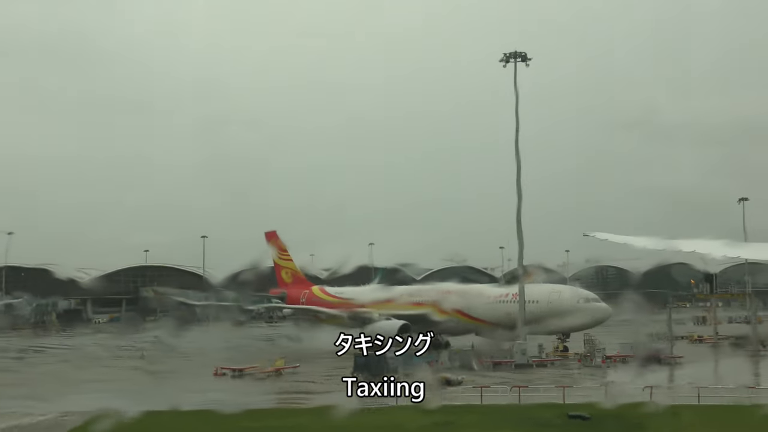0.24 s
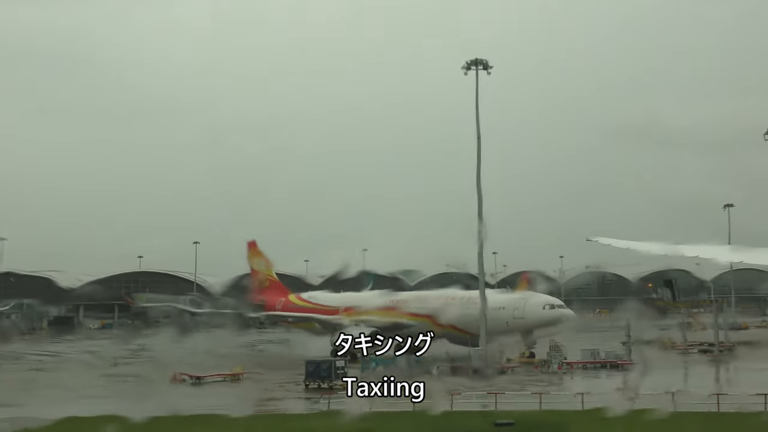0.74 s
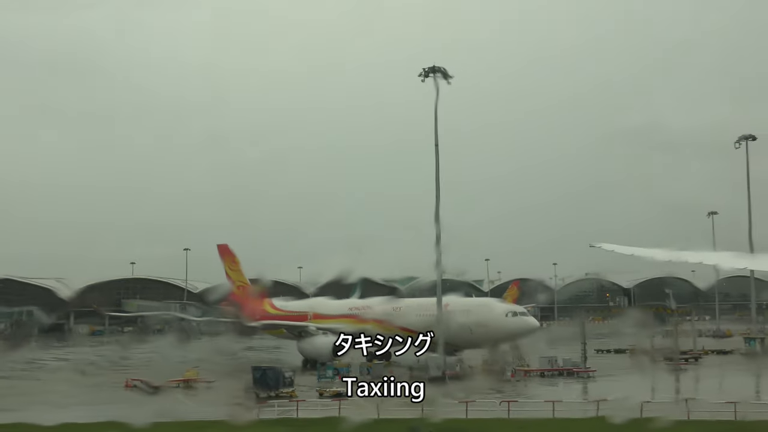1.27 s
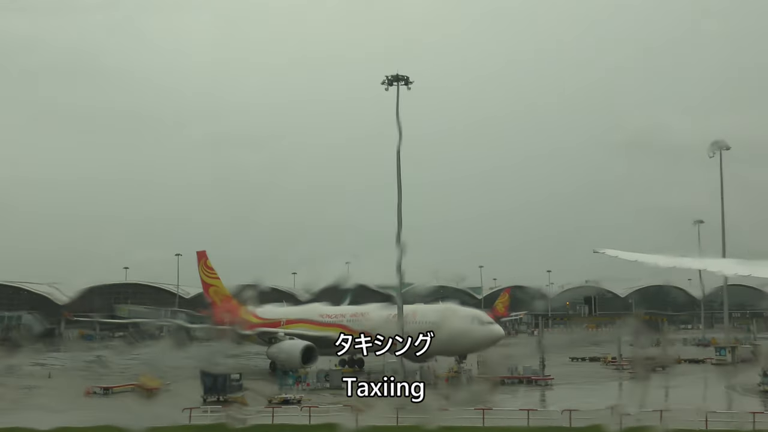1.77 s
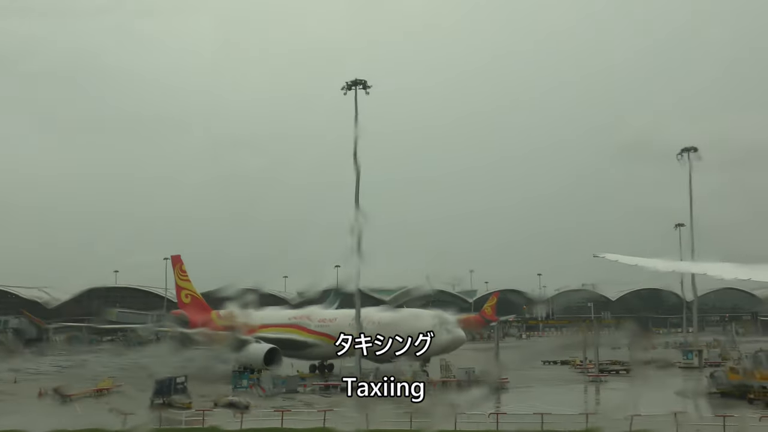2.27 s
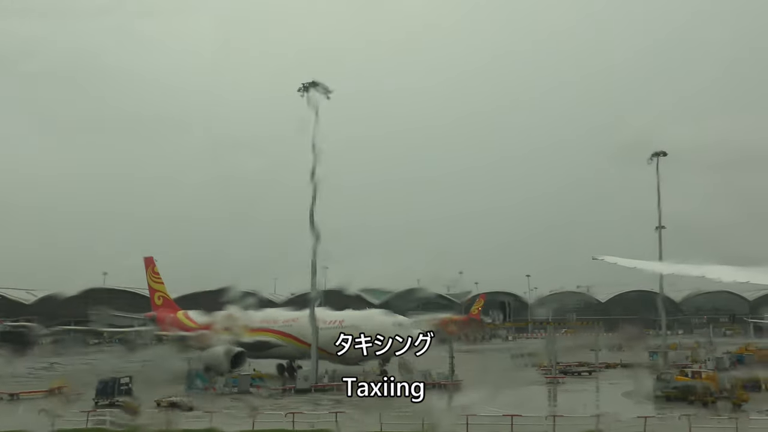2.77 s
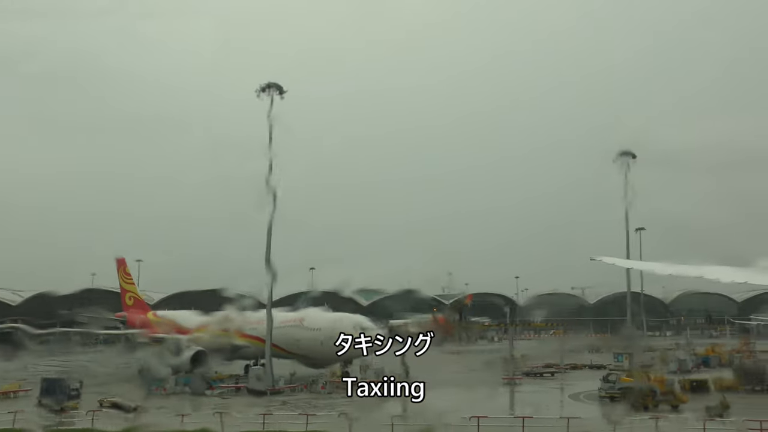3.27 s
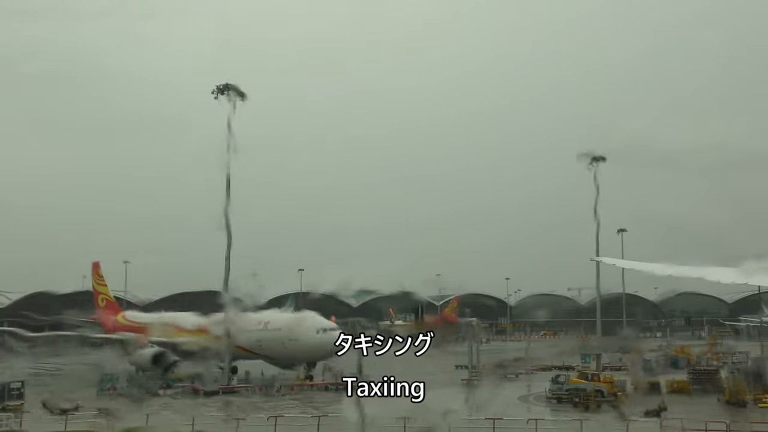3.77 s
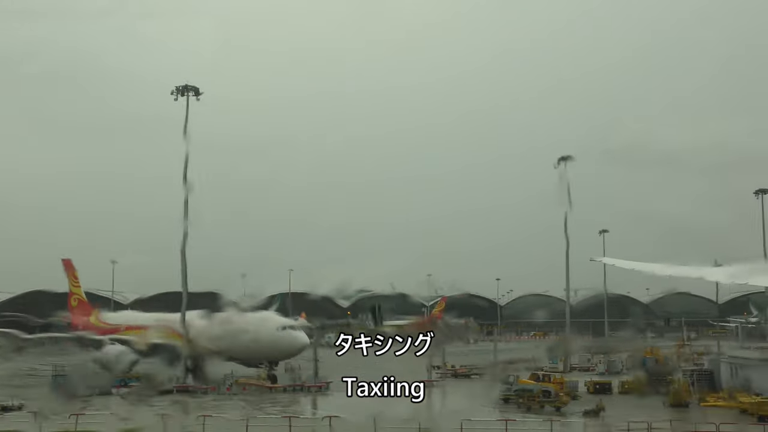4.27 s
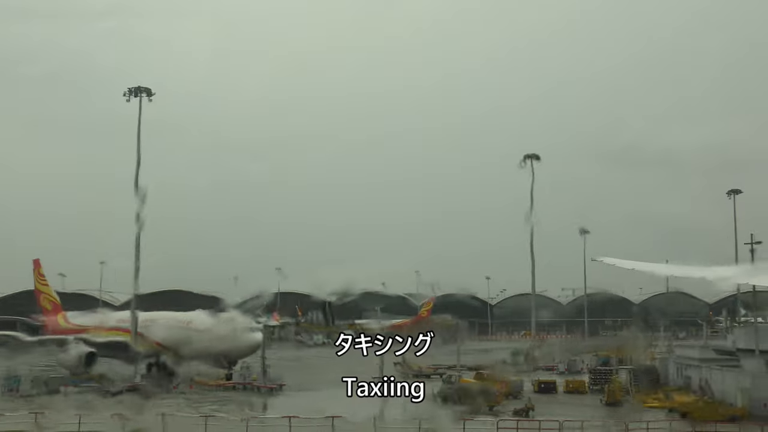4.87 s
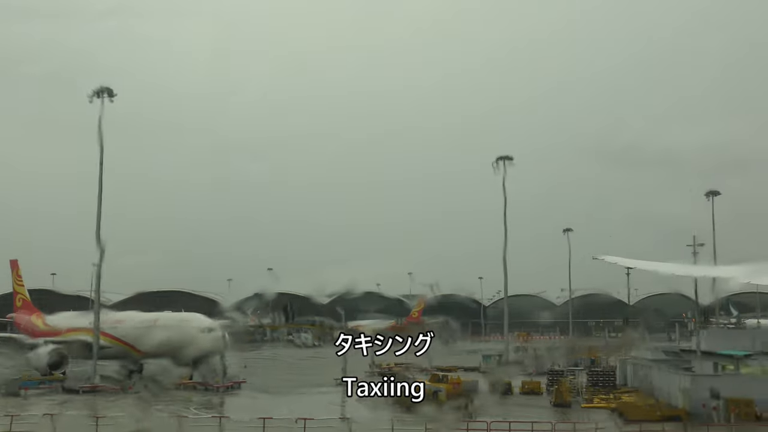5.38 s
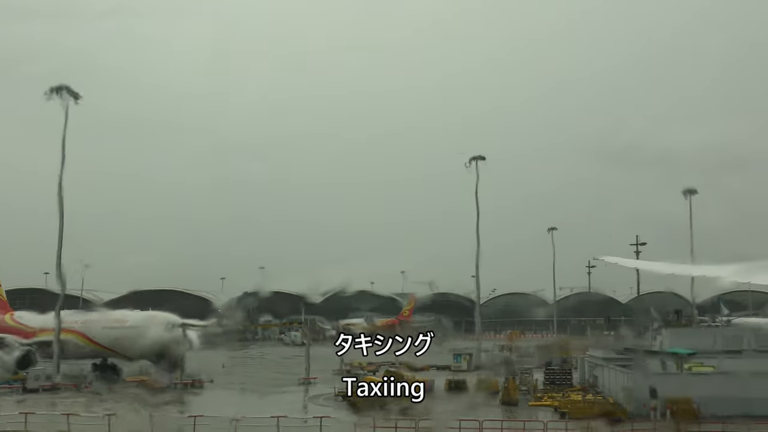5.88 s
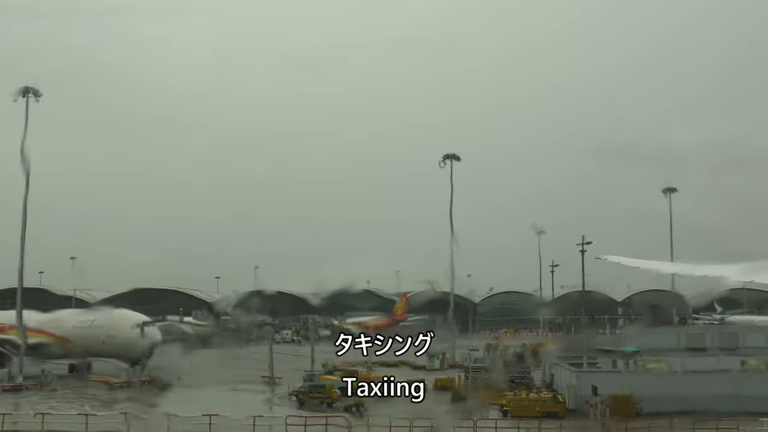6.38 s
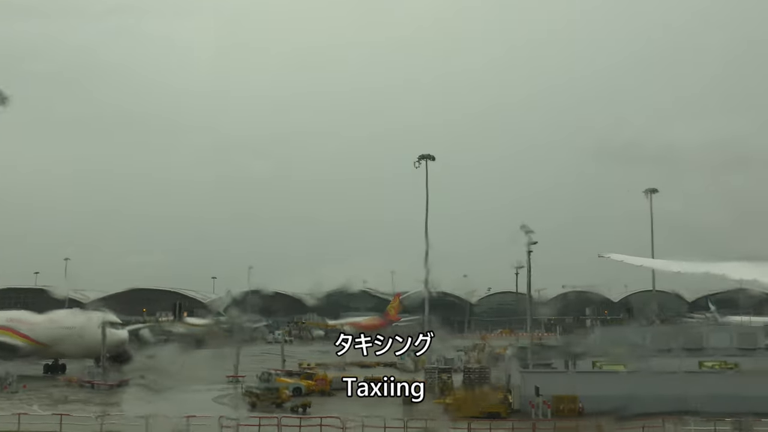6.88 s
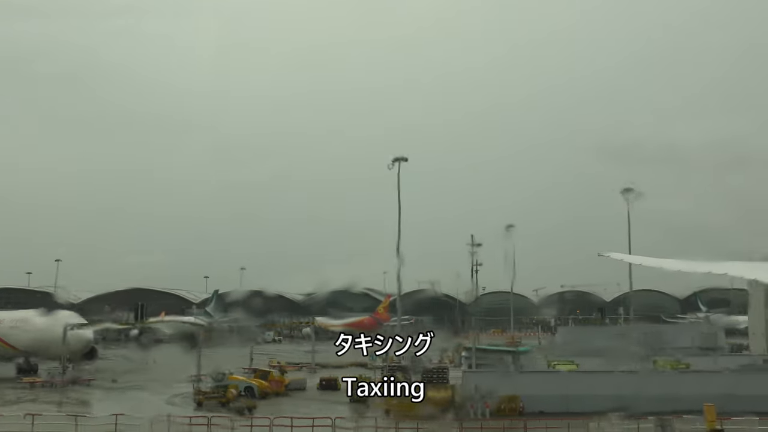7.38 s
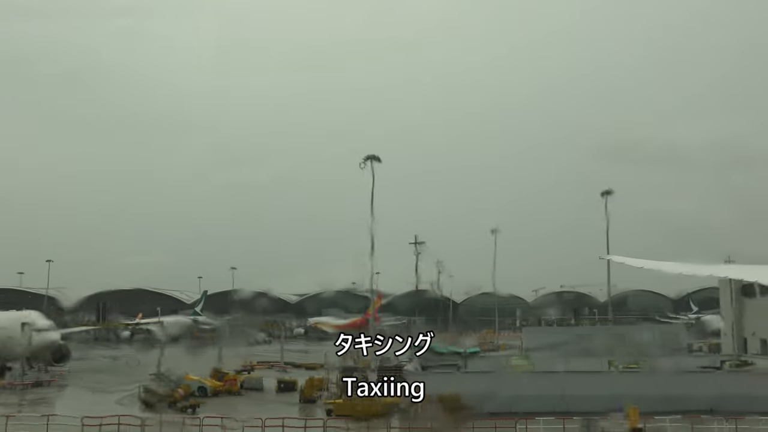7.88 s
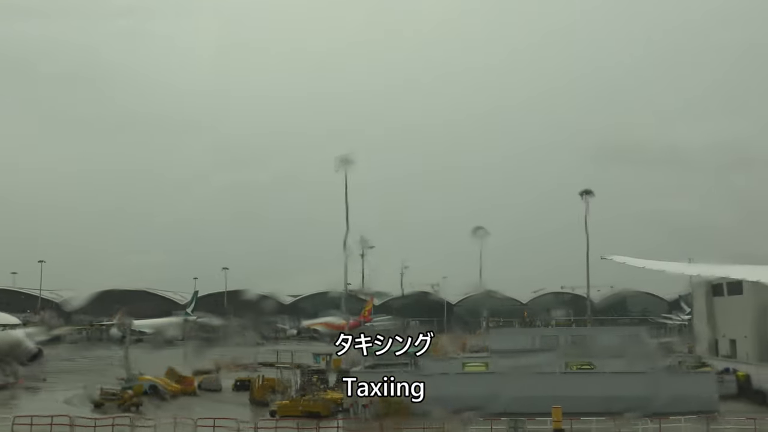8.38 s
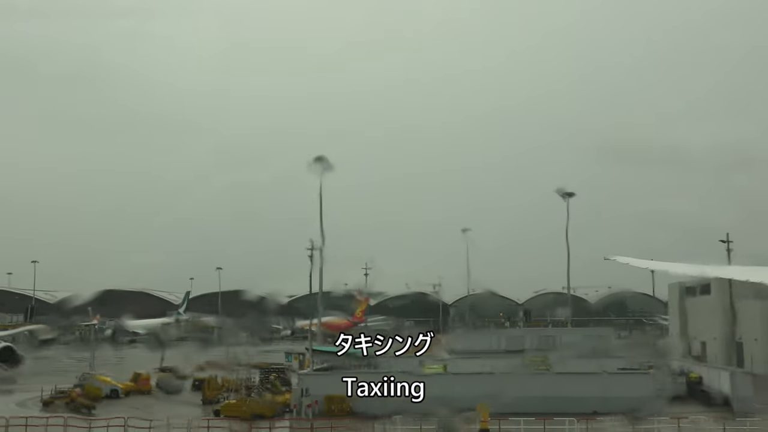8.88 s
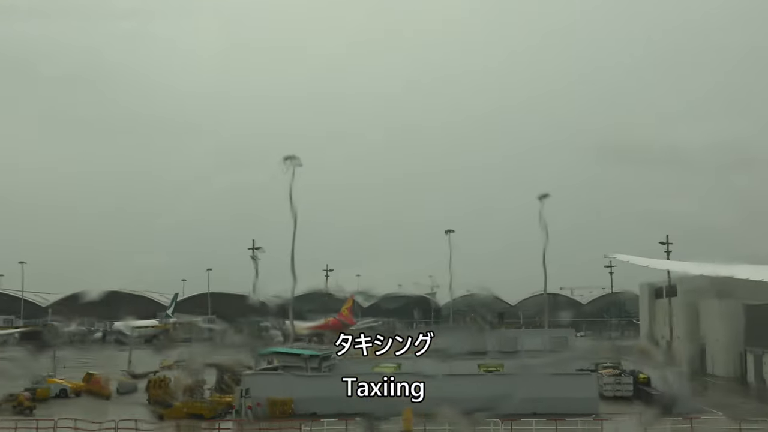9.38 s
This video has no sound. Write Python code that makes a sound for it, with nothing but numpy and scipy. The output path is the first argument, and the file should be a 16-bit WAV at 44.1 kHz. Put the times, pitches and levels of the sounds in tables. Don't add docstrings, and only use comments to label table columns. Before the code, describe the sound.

Enclosed airliner cabin during slow taxi, heard close to a seat through a small stereo microphone. From 0 s a thick low rumble of engines and tyres, with cabin booming, sits over a broad vent hiss and faint steady fan tones. The engines are strongest in the first second; from about 0.8 to 2.5 s two neighbouring hums slide downward and settle, while a thin compressor whine sinks slightly by 2 s. Rumble and hiss soften to idle by about 3.5 s, with slight later swells. The paired hums beat quickly, the automatic level ducking on each beat. A small creak comes at 0.5 s, more from 2.2 to 4.3 s, with tiny metal pings at 2.4, 3.4 and 3.9 s. Isolated faint film ticks occur through the first five seconds. At 7.6 s a wrapper is touched with a light jingle; sharp crackles peak at 7.85-7.95 s, with smaller snaps to 8.4 s and a last tick at 9.2 s. The drone continues to the end, about 9.6 s.

```python
import sys
import numpy as np
from scipy import signal
from scipy.fft import rfft, irfft, next_fast_len
from scipy.io import wavfile
from scipy.ndimage import uniform_filter1d

SR = 44100
rng = np.random.default_rng(int(sys.argv[2]) if len(sys.argv) > 2 else 0)


def pcm_store(signal):
    levels = np.round(np.clip(np.atleast_2d(signal), -1, 1) * 32767)
    wavfile.write(sys.argv[1], SR, levels.astype(np.int16).T)


def linear_from_db(decibels):
    return 10 ** (np.asarray(decibels, float) / 20)


N = 424683
SIZE = next_fast_len(N)
HZ = np.maximum(np.arange(SIZE // 2 + 1) * SR / SIZE, 1)

# pitch_hz, level_db (per Hz)
RUMBLE_COLOUR = [(12, -54), (20, -16.5), (87, -17), (135, -11), (192, -11), (222, -16.5), (270, -10.5),
                 (303, -9), (325, -7), (354, -8), (370, -20), (386, -21), (445, -25.5), (600, -54),
                 (780, -65), (1320, -120)]
# pitch_hz, level_db (per Hz)
HISS_COLOUR = [(260, -11), (450, -4.5), (580, -5.5), (800, -9), (1220, -8.5), (1760, -6), (2010, -10.5),
               (4100, -23), (5940, -23), (7300, -32), (9400, -33), (12000, -36.5), (14000, -38),
               (16500, -48.5)]
# pitch_hz, width_hz, level_db (against the rumble)
CABIN_BOOMS = [(149.3, 3.6, -6), (189, 18, -9), (236.4, 10, -6.5), (266.7, 38, -4), (283.8, 17, -12.5),
               (63.7, 21, -13), (26.8, 5, -23)]
# time_s, blade_hz, level_db
COMPRESSOR = [(0, 916, -62), (.32, 911.3, -58), (.8, 904.4, -54.5), (1.12, 900.7, -61), (1.61, 896.2, -60),
              (1.9, 894.8, -62), (2.9, 893.8, -63), (9.63, 893.8, -63)]
# multiple, idle_level_db, gain_at_top_speed_db
BLADE_MULTIPLES = [(1, -8, 21.5), (2, 3.5, -5.5), (3, -3, 1), (8, -13.5, 12), (9, 0, -2.5),
                   (10, -11.5, 3.5), (12, -30.5, 5), (14, -29.5, 7)]
# pitch_hz, level_db (against the hiss)
FAN_TONES = [(1708, -21), (2361, -19), (4721, -32), (7495, -46), (8142, -38.5), (10987, -39.5)]
# time_s, upper_hum_hz, lower_hum_hz
ENGINE_HUMS = [(0.75, 388, 364), (1.05, 380, 348.5), (1.25, 369, 333), (1.45, 363, 330), (1.75, 343.6, 324),
               (2.1, 336.5, 321), (2.5, 333, 318.5), (3.0, 332, 317.5), (3.5, 332, 316.8),
               (4.3, 329.6, 316), (5.1, 331.4, 314.8), (5.4, 330.4, 314), (5.9, 330.8, 316.6),
               (6.4, 331.6, 315.8), (7.3, 329.8, 315.6), (8.0, 330.3, 314), (8.5, 331, 314.6),
               (9.63, 330.6, 313.6)]
# hum pitch_hz, and level_db at each of those pitches
CABIN_ANSWER_HZ = [313, 318.5, 322, 333, 345, 351, 367, 385]
CABIN_ANSWER_DB = [-16, -28.5, -23, -22.5, -28, -45, -39, -61]
# time_s, cabin_db
CABIN_LEVEL = [(0, 7), (.64, 7.5), (1.0, 6.5), (1.75, 5.5), (1.85, 3), (2.2, 1.9), (3.03, 1.3), (3.19, 3),
               (3.45, .5), (5.2, 0.53), (5.75, 0.5), (6.0, 1.5), (6.36, 0), (6.9, 1.4), (7.64, 1),
               (8.9, 0.4), (9.17, 1.5), (9.63, -0.5)]
# start_s, peak_db, body_level_db, pitch_hz, fade_60db_s
WRAPPER_SNAPS = [(.185, -44, -50, 8000, .012), (1.088, -40, -47, 8000, .015),
                 (3.19, -46.5, -52, 11000, .015), (3.762, -46, -45.5, 4000, .008),
                 (4.688, -45, -48, 8000, 0.0089), (5.129, -40, -40, 9050, 0.0062),
                 (7.68, -47, -53, 10900, 0.011), (7.612, -42, -49, 5600, .04),
                 (7.85, -35.5, -33.5, 5970, 0.0079), (7.859, -27.5, -40.5, 10500, .012),
                 (7.8598, -30, -41.5, 5500, .01), (7.8623, -23.5, -34.5, 7500, 0.0055),
                 (7.8982, -29.5, -43.5, 9030, 0.004), (7.8987, -20.5, -43.5, 7500, 0.0075),
                 (7.899, -29, -48, 4360, .016), (7.9176, -33, -46, 5360, 0.016),
                 (7.917, -27, -34.5, 7870, .007), (7.933, -45, -40, 6500, 0.007),
                 (7.9425, -36.5, -42.5, 6500, 0.014), (7.955, -44, -43, 9000, .006),
                 (8.103, -44, -39, 8000, 0.015), (8.217, -29, -47, 7500, 0.0099),
                 (8.36, -45, -46, 10000, .01), (9.169, -43, -46.5, 11170, 0.011)]
# start_s, length_s, level_db, fall_db (over the length)
WRAPPER_BENDS = [
    (7.6, 0.027, -48.5, 8.5),
    (7.839, .02, -42, -3.5),
    (7.862, .022, -38.5, 8),
    (7.886, .03, -49.5, -2),
    (7.92, 0.032, -43.5, -1),
    (8.098, .022, -47.5, 4.5),
    (8.21, .015, -44.5, 0),
    (8.345, 0.046, -49.5, 5.5),
]
# pitch_hz, level_db (per Hz)
RUSTLE_SPECTRUM = [(500, 4.5), (1500, 0), (3000, -6), (6000, -10), (10000, -13), (15000, -28.5)]
# start_s, length_s, level_db, fall_db (over the length)
CREAKS = [(.5, .08, -57.5, -0.5), (2.222, 0.054, -52, 5.5), (2.355, 0.28, -53.5, 10.5),
          (2.64, 0.19, -60.5, -1), (2.92, .24, -55, 0), (3.24, 0.043, -53, 10), (3.34, .07, -56, 1.5),
          (3.465, .045, -60, 4), (3.655, .2, -56, 5), (3.87, .245, -59.5, -2.5), (4.15, .09, -61, -0.5),
          (4.26, 0.055, -65, 5)]
# pitch_hz, level_db
CREAK_COLOUR = [(5850, -14.5), (6200, -3), (6450, -0.5), (6750, -7), (7300, -9.5), (7800, -13.5)]
# start_s, pitch_hz, peak_db, fade_60db_s
METAL_PINGS = [
    (7.61, 4540, -46, 0.12),
    (7.612, 6460, -46, .11),
    (7.612, 7500, -47, .08),
    (8.38, 7200, -50, 0.062),
    (2.355, 6270, -44, 0.12),
    (2.414, 6140, -42, 0.075),
    (3.36, 6500, -47, 0.1),
    (3.89, 6600, -47, .08),
]
# pitch_hz, left_minus_right_db, left_lead_rad, likeness (0-1)
MICROPHONE = [(25, 8.5, -0.62, 0.83), (60, 5.5, -0.7, 0.95), (133, 2, -0.82, 1), (244, -0.7, -0.96, 0.98),
              (360, -1.2, -0.67, 1), (513, -4, -1.5, 0.3), (666, -14, -1.4, 0), (1200, -3.5, 0.68, 0.4),
              (1800, -0.6, .5, .55), (4000, -0.5, -0.095, 0.4), (6500, 2, 0.4, 1), (7500, -2.5, 0.4, .95),
              (9500, 0, 0, 0.5), (15000, 0, 0, .6)]


def in_time(rows):
    s, *columns = np.transpose(rows)
    return [np.interp(np.arange(N) / SR, s, c) for c in columns]


def at_hz(rows, column):
    rows = np.array(rows)
    return np.interp(np.log(HZ), np.log(rows[:, 0]), rows[:, column])


def rms_one(x):
    return x / np.sqrt(np.mean(x ** 2) + 1e-20)


def drift(rate_hz):
    r = np.exp(-80 * np.pi * rate_hz / SR)
    white = rng.standard_normal(N // 40 + 4002)
    slow = signal.lfilter([1], [1, -2 * r, r * r], white)[4000 - 4000 + 4000:]
    return np.interp(np.arange(N) / 40, np.arange(len(slow)), rms_one(slow))


def resonance(x, hz, width_hz):
    r = np.exp(-np.pi * width_hz / SR)
    turn = 2 * np.pi * hz / SR
    return signal.lfilter([(1 - r * r) / 2, 0, (r * r - 1) / 2], [1, -2 * r * np.cos(turn), r * r], x)


def double_resonance(x, hz, width_hz, second_width_hz):
    return resonance(resonance(x, hz, width_hz), hz, second_width_hz)


def sine(hz, wander_hz, flicker_db):
    turns = np.cumsum(hz + wander_hz * drift(10.73)) / SR + rng.random()
    return np.sqrt(2) * np.sin(2 * np.pi * turns) * linear_from_db(flicker_db * drift(8.4))


def patchy_noise(spectrum, patchy_db):
    colour = rfft(rng.standard_normal((2, SIZE))) * linear_from_db(at_hz(spectrum, 1))
    together = drift(4.8)
    total_power = np.sum(np.abs(colour[0]) ** 2)
    out = 0
    for octave in range(4, 15):
        share = np.cos(np.pi / 2 * np.clip(np.log2(HZ) - octave, -1, 1)) ** 2
        if np.sum(np.abs(colour[0] * share) ** 2) > 1e-5 * total_power:
            flicker_db = patchy_db * (0.52 * together + drift(10.0))
            out = out + irfft(colour * share, SIZE)[:, :N] * linear_from_db(flicker_db)
    return rms_one(out)


def spans(rows, fade_s):
    gain = 0
    for s, length, db, fall_db in rows:
        end = s + length
        shape = [(s - 0.006, -120), (s, db), (end, db - fall_db), (end + fade_s, -120)]
        gain = gain + linear_from_db(in_time(shape)[0])
    return gain


def clicks(per_s, spread_db):
    happens = rng.random(N) < per_s / SR
    size = linear_from_db(spread_db * np.minimum(rng.exponential(1, N), 4))
    return happens * size * rng.choice([-1, 1], N)


def rumble(level_db):
    white = rng.standard_normal((2, N + SR))
    booms = 0
    for hz, width_hz, db in CABIN_BOOMS:
        booms = booms + linear_from_db(db) * rms_one(double_resonance(white, hz, width_hz, width_hz)[:, SR:])
    return linear_from_db(level_db - 0.5) * (linear_from_db(0.5) * patchy_noise(RUMBLE_COLOUR, patchy_db=0.2) + booms)


def vent_hiss(level_db):
    return linear_from_db(level_db + 0.94) * patchy_noise(HISS_COLOUR, patchy_db=0.84)


def engine_hums(cabin_db):
    upper_hz, lower_hz = in_time(ENGINE_HUMS)
    follow_db = 0.66 * cabin_db
    upper_db = np.interp(upper_hz, CABIN_ANSWER_HZ, CABIN_ANSWER_DB) + follow_db
    lower_db = np.interp(lower_hz, CABIN_ANSWER_HZ, CABIN_ANSWER_DB) + follow_db
    upper = linear_from_db(upper_db) * sine(upper_hz, wander_hz=0.79, flicker_db=1.0)
    lower = linear_from_db(lower_db - 7.5 + 1.6 * drift(3.8)) * sine(lower_hz, wander_hz=1.01, flicker_db=0.74)
    return upper + lower


def shaft_tone(cabin_db, hz, idle_db, db_per_cabin_db, db_per_hz, wander_hz, swell_db):
    upper_hz = in_time(ENGINE_HUMS)[0]
    above_idle_hz = upper_hz - upper_hz.min()
    level_db = idle_db + db_per_cabin_db * cabin_db + db_per_hz * above_idle_hz + swell_db * drift(2.5)
    return linear_from_db(level_db) * sine(hz, wander_hz, flicker_db=0.51)


def shafts(cabin_db):
    low = shaft_tone(cabin_db, 87.3, idle_db=-42, db_per_cabin_db=0.84, db_per_hz=-0.0055,
                     wander_hz=0.8, swell_db=3)
    high = shaft_tone(cabin_db, 132.04, idle_db=-37.5, db_per_cabin_db=0.5, db_per_hz=0.1445,
                      wander_hz=1.0, swell_db=1)
    return low + high


def compressor_whine():
    blade_hz, level_db = in_time(COMPRESSOR)
    fast = (blade_hz - blade_hz.min()) / np.ptp(blade_hz)
    tones = 0
    for multiple, db, gain_db in BLADE_MULTIPLES:
        tones = tones + linear_from_db(db + gain_db * fast ** 2) * sine(multiple * blade_hz, 1.42, 0.93)
    return linear_from_db(level_db) * tones


def fan_tones(hiss_db):
    return sum(linear_from_db(hiss_db + db) * sine(hz, wander_hz=1.5, flicker_db=1.3) for hz, db in FAN_TONES)


def blade_tone(cabin_db):
    tone = linear_from_db(-57.5 + 0.6 * cabin_db) * sine(in_time(COMPRESSOR)[0], wander_hz=1.6, flicker_db=1.5)
    return np.array([linear_from_db(-1) * tone, -tone])


def wrapper_snaps():
    out = np.zeros((2, N))
    length = 4000
    t = np.arange(length) / SR
    bursts = rng.laplace(size=(len(WRAPPER_SNAPS), 2, 2, length))
    bursts[..., 6] += 9.0
    body_band = signal.butter(2, [700, 4000], "band", fs=SR, output="sos")
    for (s, peak_db, body_db, hz, t60), (high, low) in zip(WRAPPER_SNAPS, bursts):
        rise = 1 - np.exp(-t / 0.00011)
        fall = linear_from_db(-60 * t / max(t60, 0.004)) + linear_from_db(-12.0 - 60 * t / 0.042)
        bright = double_resonance(high, hz, 0.38 * hz, 0.38 * hz)
        body = signal.sosfilt(body_band, low)
        snap = linear_from_db(peak_db - 9) * rms_one(bright) + linear_from_db(body_db + 3.0) * rms_one(body)
        i = round(s * SR)
        out[:, i:i + length] += (snap * rise * fall)[:, :N - i]
    return out


def creak(per_s):
    slips = clicks(per_s, spread_db=-2.0)
    dealt = rng.integers(0, 14, N)
    pitches = np.geomspace(CREAK_COLOUR[0][0], CREAK_COLOUR[-1][0], 14)
    levels_db = np.interp(pitches, *np.transpose(CREAK_COLOUR))
    body = 0
    for k, (hz, db) in enumerate(zip(pitches, levels_db)):
        body = body + linear_from_db(db) * double_resonance(slips * (dealt == k) + 1e-18, hz, 150, 300)
    shell = double_resonance(slips, 4300, 900, 1200)
    edge = double_resonance(slips, 11800, 700, 900)
    ringing = rms_one(body) + linear_from_db(-6.0) * rms_one(shell) + linear_from_db(-16.0) * rms_one(edge)
    return spans(CREAKS, fade_s=0.08) * ringing


def pings():
    t = np.arange(N) / SR
    white = rng.standard_normal(N)
    out = 0
    for s, hz, db, t60 in METAL_PINGS:
        age = np.maximum(t - s, 0)
        shape = linear_from_db(db + 1 - 60 * age / t60) * (1 - np.exp(-age / 0.006))
        out = out + shape * rms_one(double_resonance(white, hz, 250, 400))
    return out


def wrapper_rustle():
    grains = np.array([clicks(12000, spread_db=3.0), clicks(12000, spread_db=2.0)])
    coloured = irfft(rfft(grains, SIZE) * linear_from_db(at_hz(RUSTLE_SPECTRUM, 1)), SIZE)[:, :N]
    return spans(WRAPPER_BENDS, fade_s=0.012) * rms_one(coloured)


def ports(common, apart):
    lead_rad = at_hz(MICROPHONE, 2)
    tilt = linear_from_db(at_hz(MICROPHONE, 1) / 2) * np.exp(0.5j * lead_rad)
    alike = np.clip(at_hz(MICROPHONE, 3), 0, 1)
    a = rfft(common, SIZE) * np.sqrt((1 + alike) / 2)
    b = rfft(apart, SIZE) * np.sqrt((1 - alike) / 2)
    middle = np.sqrt(np.abs(tilt) ** 2 + np.abs(1 / tilt) ** 2 + 2 * alike * np.cos(lead_rad)) / 2
    return irfft(np.array([(a + b) * tilt, (a - b) / tilt]) / middle, SIZE)[:, :N]


def scene():
    cabin_db = in_time(CABIN_LEVEL)[0]
    surge = drift(5.5)
    rumble_db = -30.5 + 0.6 * cabin_db + 1.43 * surge
    hiss_db = -45.5 + cabin_db + 0.12 * surge
    around = rumble(rumble_db) + vent_hiss(hiss_db) + wrapper_snaps() + wrapper_rustle()
    machines = engine_hums(cabin_db) + shafts(cabin_db) + compressor_whine() + fan_tones(hiss_db)
    spots = machines + creak(per_s=1300) + pings()
    return ports(around[0] + spots, around[1]) + blade_tone(cabin_db)


def band_limit(x):
    return signal.sosfilt(signal.butter(12, 15710, fs=SR, output="sos"), x)


def record(dry):
    t = np.arange(N) / SR
    level_db = 20 * np.log10(np.abs(dry).max(axis=0) + 1e-5)
    held_db = np.maximum.accumulate(level_db + 90 * t) - 90 * t
    r = np.exp(-1 / (0.00083 * SR))
    held_db = signal.lfilter([1 - r], [1, -r], held_db - held_db.mean())
    ripple_db = held_db - uniform_filter1d(held_db, size=SR // 3)
    ducked = dry * linear_from_db(-0.7 * ripple_db)
    rounded = 0.48 * np.tanh(ducked / 0.46)
    return band_limit(rounded)


dry = scene()
out = record(dry)
pcm_store(out)
```